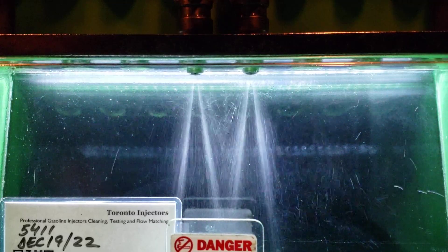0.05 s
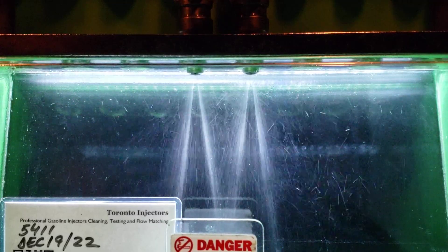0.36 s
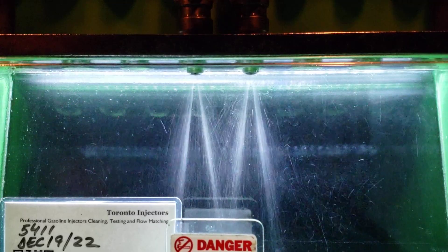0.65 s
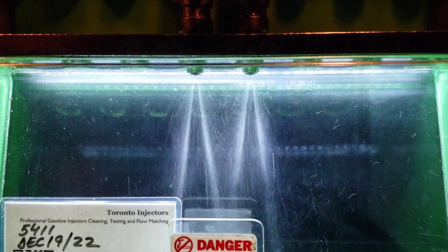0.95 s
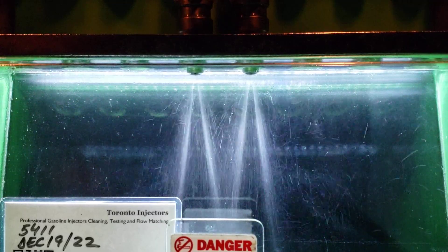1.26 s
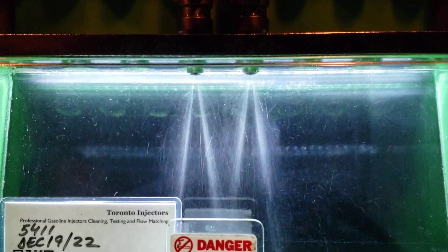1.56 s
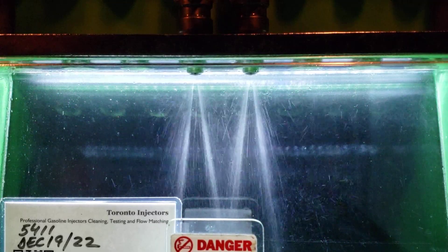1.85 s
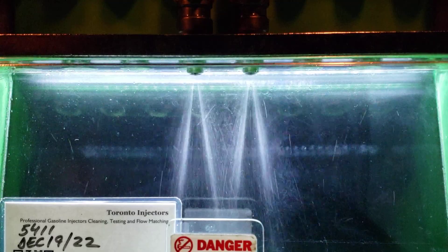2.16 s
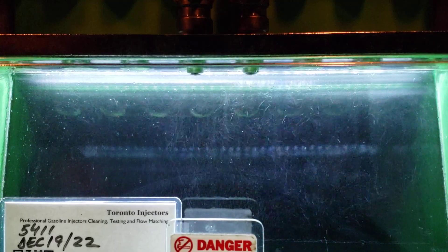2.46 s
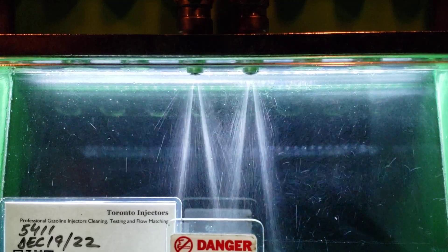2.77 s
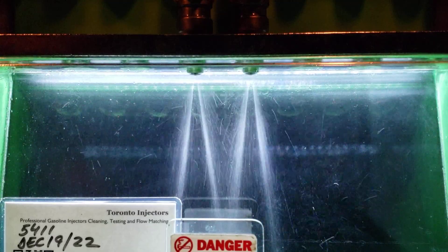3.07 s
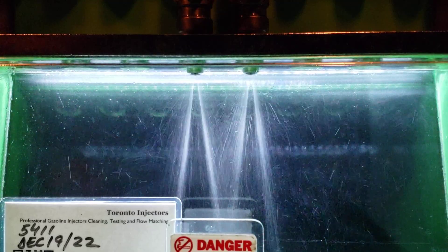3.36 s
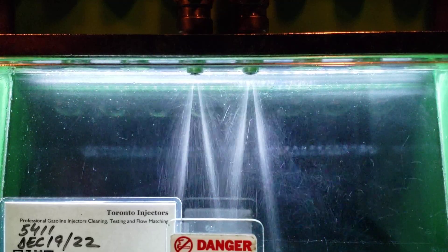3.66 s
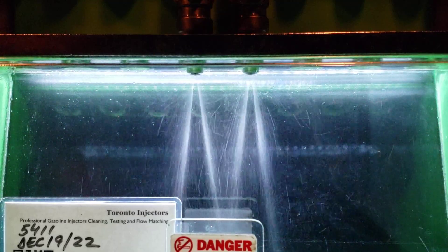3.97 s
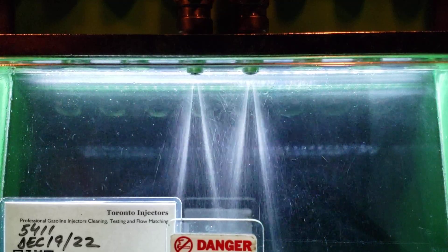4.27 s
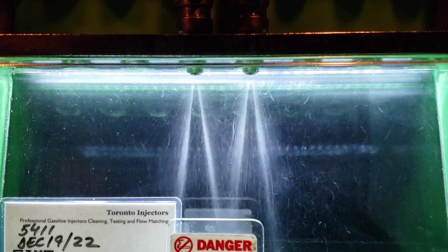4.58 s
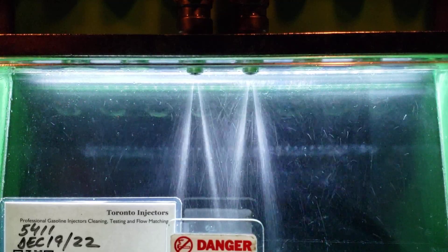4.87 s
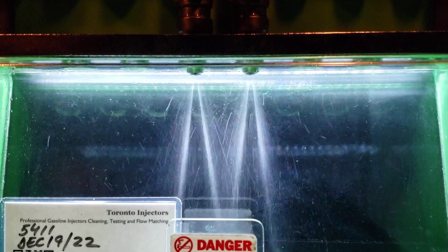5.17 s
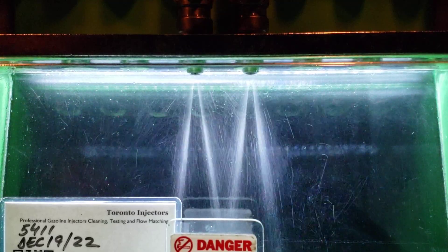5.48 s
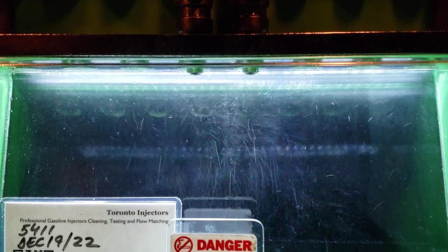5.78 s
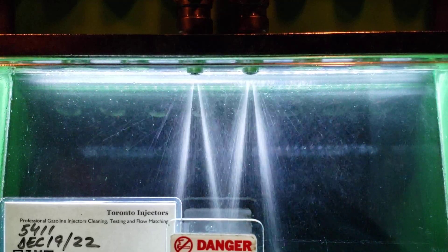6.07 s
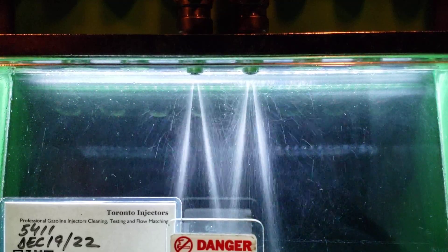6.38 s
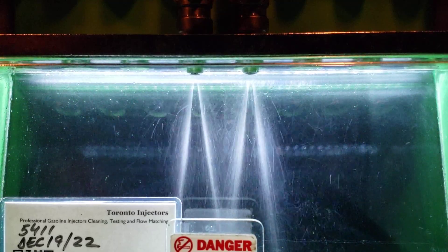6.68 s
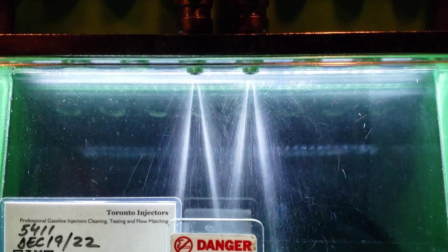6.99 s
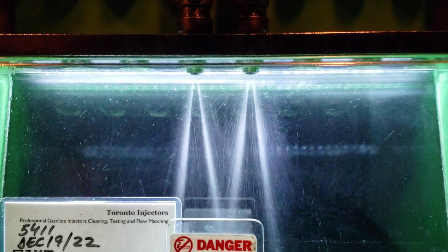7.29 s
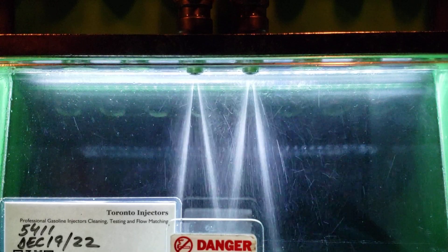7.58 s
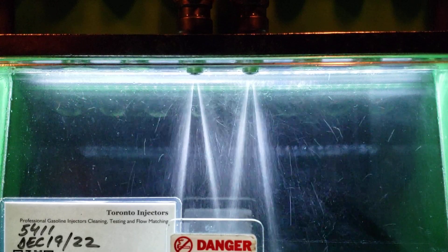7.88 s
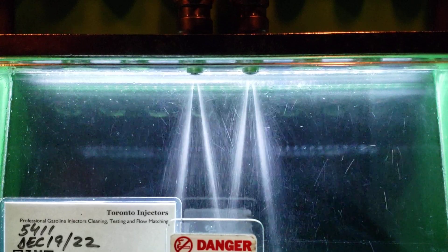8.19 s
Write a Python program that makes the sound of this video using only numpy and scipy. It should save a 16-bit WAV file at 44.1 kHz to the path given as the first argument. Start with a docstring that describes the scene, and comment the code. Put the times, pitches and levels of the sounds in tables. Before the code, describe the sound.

A harsh, ringing buzz of rapidly clicking fuel injectors and hissing spray, pausing briefly twice while a pump hums on.

```python
"""A hard, bright buzz: two fuel injectors firing about 57 times a second, in three runs, in a glass chamber.
Each needle clicks open, bounces and snaps shut around a puff of spray, while the bench (fuel rail,
glass and steel bodies) sings at multiples of the firing rate. Underneath, the fuel pump hums and
the machine rushes throughout. The right microphone port faces the bench; the left one is shaded."""
import sys
import numpy as np
from scipy import signal
from scipy.fft import rfft, irfft
from scipy.io import wavfile
from scipy.ndimage import uniform_filter1d

SR = 44100
rng = np.random.default_rng(int(sys.argv[2]) if len(sys.argv) > 2 else 0)


def master_out(mix):
    """Clip the mix to full scale and print it as 16-bit PCM to the path in sys.argv[1]."""
    frames = np.transpose(np.atleast_2d(mix))
    ceiling = np.clip(frames, -1, 1)
    pcm = np.round(ceiling * 32767).astype(np.int16)
    wavfile.write(sys.argv[1], SR, pcm)


N = 367794
T = np.arange(N) / SR

# tone colour of the pump and fan noise: f/Hz, relative level/dB
RUSH_EQ = [(25, -31), (45, -18), (80, -4), (205, 1), (280, -12), (335, -6), (390, -8), (425, -17),
           (510, -6), (690, -7), (830, -16), (1200, -14), (2500, -24), (5000, -31), (8500, -34),
           (10700, -31), (15500, -28.5)]
# how alike that noise is in the two ports: f/Hz, likeness/0-1
RUSH_LIKENESS = [(60, .95), (130, 0.93), (290, 1), (640, 0.2), (1400, 0.16), (3100, .04)]
# that noise at the left port against the right: f/Hz, level/dB
RUSH_LEFT_EQ = [(60, 0), (110, -13.5), (200, -11.5), (700, -11.5), (1290, -10.5), (4400, -19), (15000, -18)]
# pump tones: multiple of the shaft speed, level/dB, left against right/dB
PUMP_TONES = [(1, -37, -14), (2, -52.5, -2.5), (18, -49, -22.5)]
# runs of the injectors: start/s, stop/s, firing rate/Hz, delay of the second injector/s
FIRING_RUNS = [(.0022, 2.29, 57.455, .0024), (2.6503, 5.774, 57.456, .003), (6.1007, 8.34, 56.648, .00472)]
# modes of fuel rail, glass chamber and steel bodies: f/Hz, width/Hz, relative level/dB, left phase/rad
RAIL_MODES = [(174.76, 13, -39.5, 0), (231.1, 5.2, -46, 0), (597, 51, -47.5, .3), (833, 165, -57.5, 0)]
GLASS_MODES = [(1085, 70, -44, -2.9), (1206, 90, -45.6, .2), (1304, 35, -45.2, -1.9),
               (1553, 15, -39.9, -.1), (1690, 50, -51, -.8), (1830, 120, -52, -1.6), (2528, 20, -52.5, 2.2),
               (2995, 45, -51, 0), (3320, 70, -48.5, 2.3), (3512, 10, -47, 1.5), (3640, 110, -49, 1.4),
               (4422, 41, -47.5, -.3), (4688, 64, -46.5, 2), (4940, 25, -51, 0), (5290, 15, -47.5, -2)]
STEEL_MODES = [(6425, 55, -49, 1), (9180, 60, -41.5, 2.1), (9710, 15, -49, -1), (10628, 16, -47, 3),
               (11372, 45, -39.8, -2), (12225, 110, -45.5, 1), (14010, 70, -41, -1), (14307, 15, -42, 2),
               (14590, 150, -41, -2), (15220, 38, -39, 1)]
# how hard each run drives the modes: gain/dB
RUN_DRIVE_DB = [-0.6, 0.1, .3]
# tone colour of the spray: f/Hz, relative level/dB
SPRAY_EQ = [(300, -20), (1200, -7), (2300, -8), (3500, -4.5), (5000, -7), (7000, -8), (9500, -8),
            (11500, -3), (13000, 0), (15000, 0)]
# needle impacts in one firing, opening first: t/s, relative level/dB of first and of second injector
NEEDLE_IMPACTS = [(0, -6, -8), (.00055, -5, -6), (.00105, -7, -9), (.0018, -8, -10), (.0044, -1, 0),
                  (.0047, -7, -2)]
# how hard the needles hit in each run: gain/dB
RUN_FORCE_DB = [-3, -2.5, -3]
# what an impact rings in (steel body, glass chamber, room): t60/s, relative level/dB
RING_SPACES = [(.004, 0), (.03, -1), (.15, -6)]
# tone colour of the clicks: f/Hz, relative level/dB
CLICK_EQ = [(250, -32), (600, -19.5), (1200, -22.5), (1700, -16), (2300, -20.5), (3400, -16), (5500, -18),
            (6800, -20), (8200, -17), (9300, -11.5), (10900, -17.5), (11500, -9.5), (13300, -10.5),
            (14600, -2.5), (15700, -8.5)]
# narrow bands that the chamber holds back: f/Hz, half-width/Hz, gain/dB
CHAMBER_NOTCHES = [(1430, 60, -6), (2400, 35, -8), (4210, 35, -12), (4570, 25, -6), (5450, 30, -8),
                   (6660, 50, -8), (10850, 110, -4)]
# shading of clicks, spray and bench at the left port: f/Hz, gain/dB
BENCH_LEFT_EQ = [(170, -18.5), (700, -15), (1090, -9), (1250, -12), (1550, -4.5), (2400, -13.5),
                 (4400, -15.5), (8000, -26), (11000, -10.5), (15000, -27)]

OPEN_S = .0044  # how long a needle stays lifted
RING_SIZE, CYCLE_SIZE = 8192, 32768  # samples in an impact's tail, points in a one-firing wavetable


def amp(db):
    """Decibels to amplitude."""
    return 10 ** (np.asarray(db) / 20)


def unit_rms(x):
    """Scales each channel to rms 1."""
    return x / np.sqrt(np.mean(x ** 2, axis=-1, keepdims=True) + 1e-20)


def curve(points, hz):
    """Joins (f/Hz, value) points on a log-frequency axis."""
    f, value = np.transpose(points)
    return np.interp(np.log(hz + 1), np.log(f + 1), value)


def equalise(x, eq, notches=()):
    """Minimum-phase EQ from a (f/Hz, level/dB) curve and narrow notches."""
    hz = abs(np.fft.fftfreq(4096, 1 / SR))
    db = curve(eq, hz) + sum(depth / (1 + ((hz - f) / width) ** 2) for f, width, depth in notches)
    response = np.exp(np.conj(signal.hilbert(np.log(amp(db)))))
    taps = np.fft.ifft(response).real[:2048]
    return signal.oaconvolve(x, taps.reshape((1,) * (x.ndim - 1) + (-1,)), axes=-1)[..., :N]


def drift(hz):
    """Slow random wander of rms 1, rolled off above the given rate."""
    f = np.fft.rfftfreq(N // 100, 100 / SR)
    slow = unit_rms(irfft(rfft(rng.standard_normal(N // 100)) / (1 + (f / hz) ** 2)))
    return np.interp(T, np.linspace(0, T[-1], len(slow)), slow)


def machine_rush(right_db=-37):
    """The bed: steady noise of pump and fan, alike in both ports only in the bass."""
    right, other = rfft(rng.standard_normal((2, N)))
    hz = np.fft.rfftfreq(N, 1 / SR)
    alike = np.clip(curve(RUSH_LIKENESS, hz), 0, 1)
    left = (alike * right + np.sqrt(1 - alike ** 2) * other) * amp(curve(RUSH_LEFT_EQ, hz))
    rush = irfft(np.array([left, right]) * amp(curve(RUSH_EQ, hz)), N)
    return amp(right_db) * rush / np.std(rush[1])


def fuel_pump(shaft_hz=50.25, relief_hz=.4, follow_s=.15, waver_hz=.14):
    """Shaft hum and commutator whine; the pump runs a little faster while the injectors relieve it."""
    spraying = sum((T > start) & (T < stop) for start, stop, _, _ in FIRING_RUNS)
    lag = np.exp(-1 / (follow_s * SR))
    relief = signal.lfilter([1 - lag], [1, -lag], spraying)
    turns = np.cumsum(shaft_hz + relief_hz * relief + waver_hz * drift(3.01)) / SR
    out = np.zeros((2, N))
    for order, db, left_db in PUMP_TONES:
        tone = np.sqrt(2) * np.sin(2 * np.pi * (order * turns + rng.random()))
        waver_db = .6 if order == 1 else .5
        out += amp([[left_db], [0]]) * amp(db + waver_db * drift(2.3)) * tone
    return out


def resonance(modes, settle_s, run, clicks):
    """Harmonics of the firing rate that meet a mode swell during a run and ring out after it."""
    start, stop, rate, delay = run
    hz = rate * np.arange(CYCLE_SIZE // 2 + 1)
    centre, width, db, left_rad = np.transpose(modes)
    polarity = (-1) ** np.arange(len(modes))
    swing = polarity * amp(db) / (1 + 2j * (hz[:, None] - centre) / width) ** 2
    left, right = (swing * np.exp(1j * left_rad)).sum(1), swing.sum(1)
    live = slice(round(start * SR), round((stop + .2) * SR))
    t = T[live]
    cycles = (t - start - delay - OPEN_S) * rate  # 0 as the second needle shuts
    place = (cycles * CYCLE_SIZE).astype(int) % CYCLE_SIZE
    drive = rfft(np.bincount(place, clicks[1, live], CYCLE_SIZE))
    # the high harmonics swing a quarter cycle off the clicks that drive them
    slip = (np.angle(drive * np.conj(right)) % np.pi - np.pi / 2) * np.minimum(hz / 2500, 1) ** 2
    wavetable = irfft(np.array([left, right]) * np.exp(1j * slip)) * CYCLE_SIZE / np.sqrt(2)
    swell = 1 - np.exp(-np.maximum(t - start, 0) / settle_s)
    release = np.exp(-np.maximum(t - stop, 0) / settle_s)
    out = np.zeros((2, N))
    out[:, live] = swell * release * wavetable[:, place]
    return out


def bench_song(clicks, waver_db=.87):
    """Driven by the needles, the rail throbs, the glass sings and the steel whistles."""
    out = np.zeros((2, N))
    for modes, trim_db, settle_s in [(RAIL_MODES, -.1, .023), (GLASS_MODES, -.3, .024),
                                     (STEEL_MODES, -1.8, .009)]:
        song = sum(amp(drive_db) * resonance(modes, settle_s, run, clicks)
                   for run, drive_db in zip(FIRING_RUNS, RUN_DRIVE_DB))
        out += amp(trim_db + waver_db * drift(1.9)) * song
    return out


def firings(run, injector):
    """Times in seconds at which injector 0 or 1 is switched on."""
    start, stop, rate, delay = run
    return np.arange(start, stop, 1 / rate) + injector * delay


def fuel_spray(level_db=-33, clear_s=.014):
    """Fuel hisses while a needle is lifted; the mist gives each puff a short tail."""
    on = np.concatenate([firings(run, injector) for run in FIRING_RUNS for injector in range(2)])
    opens = np.histogram(on * SR, N, (0, N))[0]
    shuts = np.histogram((on + OPEN_S) * SR, N, (0, N))[0]
    lifted = np.cumsum(opens - shuts)
    mist = signal.lfilter([1], [1, -np.exp(-1 / (clear_s * SR))], lifted)
    hiss = np.sqrt(mist) * rng.standard_normal((2, N))
    return amp(level_db) * unit_rms(equalise(hiss, SPRAY_EQ, CHAMBER_NOTCHES))


def pulses(times, sizes):
    """Band-limited ticks, placed more finely than one sample."""
    at = np.floor(times * SR).astype(int)[:, None] + np.arange(-8, 9)
    offset = at - times[:, None] * SR
    shape = np.sinc(offset) * np.cos(np.pi * offset / 18) ** 2
    return np.bincount(np.clip(at, 0, N).ravel(), (sizes[:, None] * shape).ravel(), N + 1)[:N]


def tail(t60):
    """A dying burst of dense modes for each port, even in spectrum."""
    fade = amp(-60 * np.arange(RING_SIZE) / SR / t60)
    x = rng.standard_normal((2, RING_SIZE)) * fade
    for _ in range(3):
        x = irfft(np.exp(1j * np.angle(rfft(x))))  # all modes equally strong
        power = uniform_filter1d(x ** 2, int(SR * t60 / 10) + 2, axis=1)
        x = x * fade / np.sqrt(power + 1e-12)  # smooth decay
    return unit_rms(x)


def impact_ring():
    """One impact: the bright steel body, stronger on the right, then the glass chamber, then the room."""
    steel, glass, room = (amp(db) * tail(t60) for t60, db in RING_SPACES)
    steel = equalise(steel, [(2500, -9), (8000, -4.5), (13000, 0)])[:, :RING_SIZE]
    return steel * amp([[-6], [0]]) + glass + room


def needle_clicks(level_db=-22, uneven_db=.6):
    """Needles open, bounce and shut microseconds off the beat: clean low harmonics, a frayed top."""
    out = np.zeros((2, N))
    for injector in range(2):
        runs = [firings(run, injector) for run in FIRING_RUNS]
        on = np.concatenate(runs)
        force_db = np.repeat(RUN_FORCE_DB, [len(run) for run in runs])
        for after_s, *levels_db in NEEDLE_IMPACTS:
            # the spring closes less exactly than the coil opens
            jitter_s, wander_s = (10e-6, 4e-6) if after_s >= OPEN_S else (5e-6, 2e-6)
            timing, strength = rng.standard_normal((len(on), 2)).T
            times = on + after_s + jitter_s * timing + wander_s * np.interp(on, T, drift(2.4))
            blows = pulses(times, amp(force_db + levels_db[injector] + uneven_db * strength))
            out += signal.oaconvolve(blows[None], impact_ring(), axes=1)[:, :N]
    return amp(level_db) * unit_rms(equalise(out, CLICK_EQ, CHAMBER_NOTCHES))


def scene():
    """The injectors, shaded at the left port, over the bed of the running machine."""
    clicks = needle_clicks()
    left, right = clicks + fuel_spray() + bench_song(clicks)
    return np.array([equalise(left, BENCH_LEFT_EQ), right]) + fuel_pump() + machine_rush()


def record(dry):
    """A steep low-pass takes off the very top."""
    cutoff_hz = 15790
    taps = signal.firwin(1023, cutoff_hz, window=("kaiser", 8), fs=SR)
    return signal.oaconvolve(dry, taps[None], "same", axes=1)


dry = scene()
out = record(dry)
master_out(out)
```